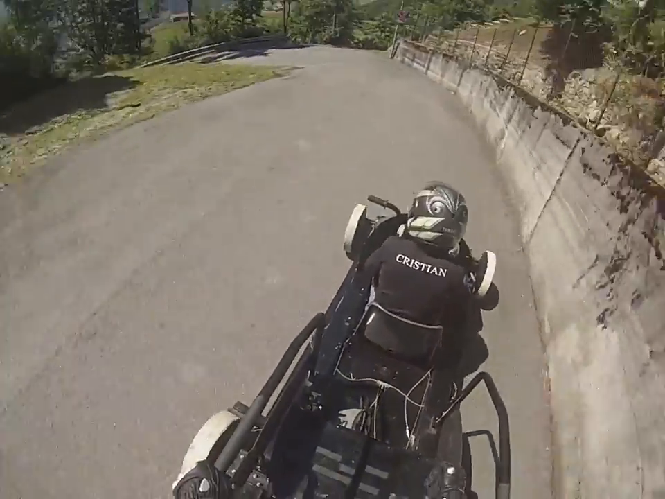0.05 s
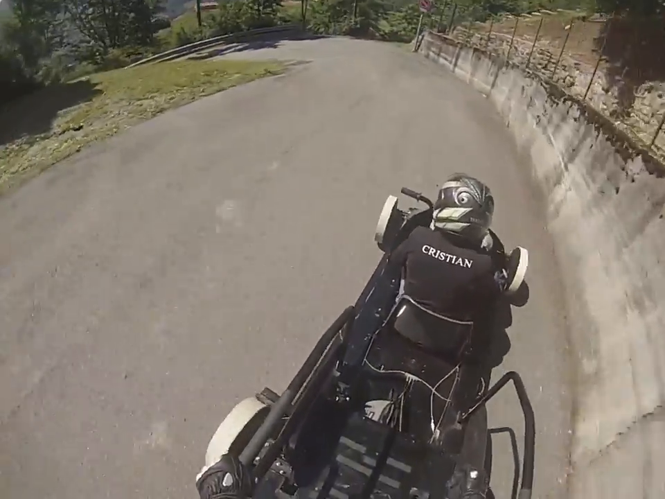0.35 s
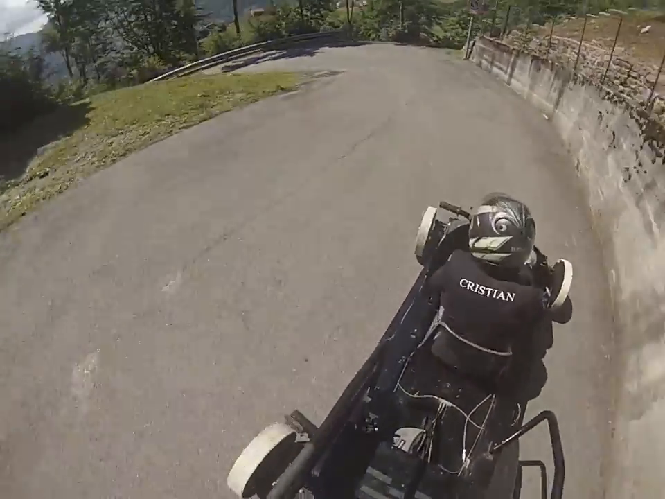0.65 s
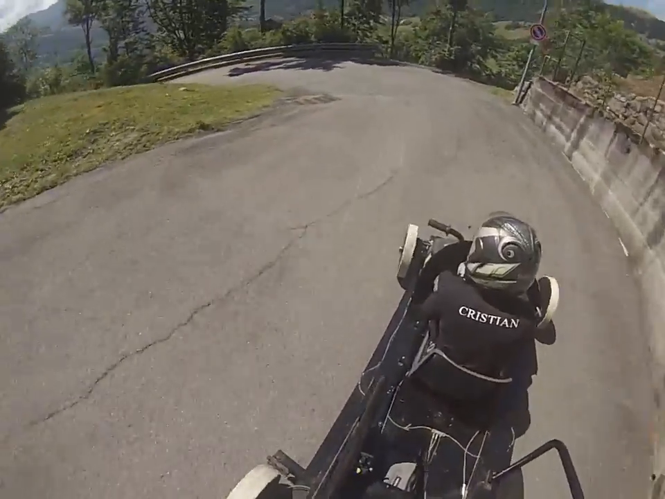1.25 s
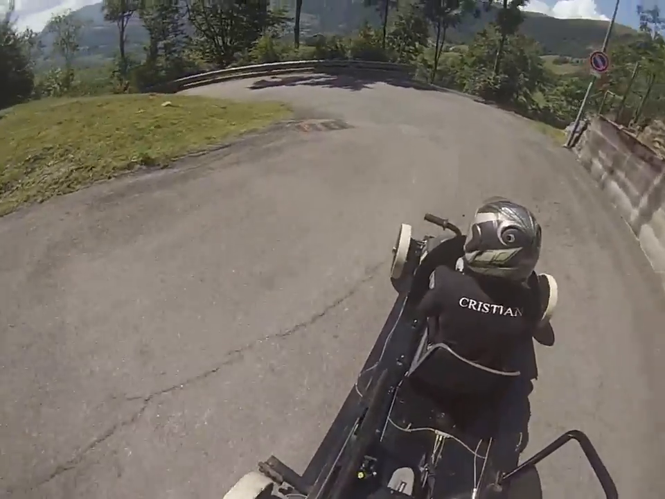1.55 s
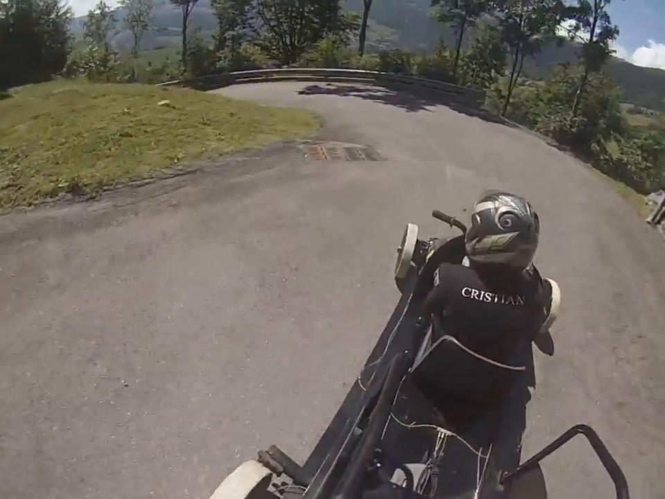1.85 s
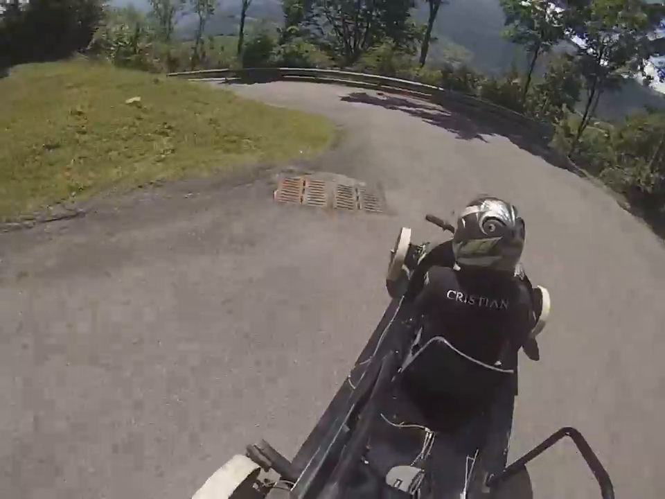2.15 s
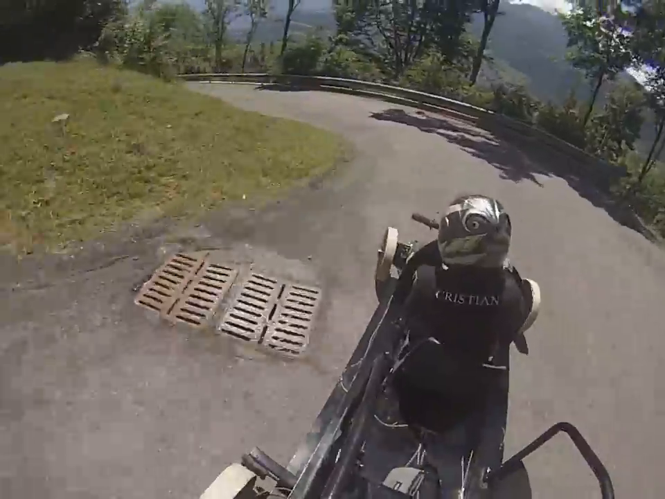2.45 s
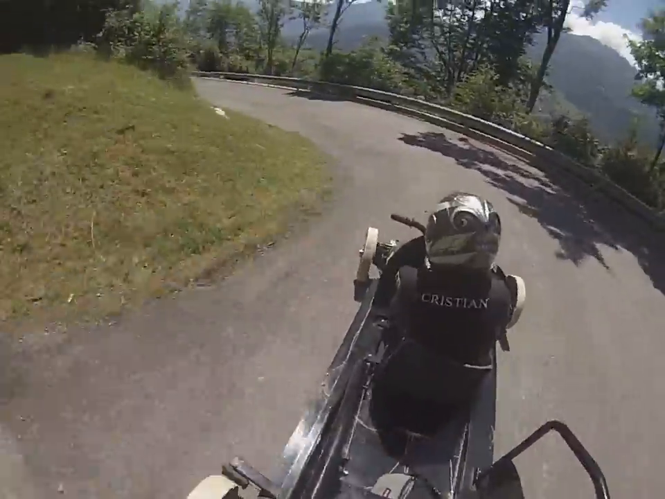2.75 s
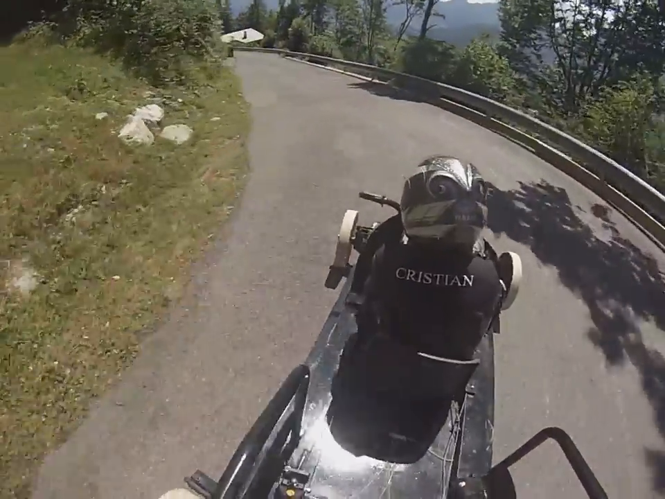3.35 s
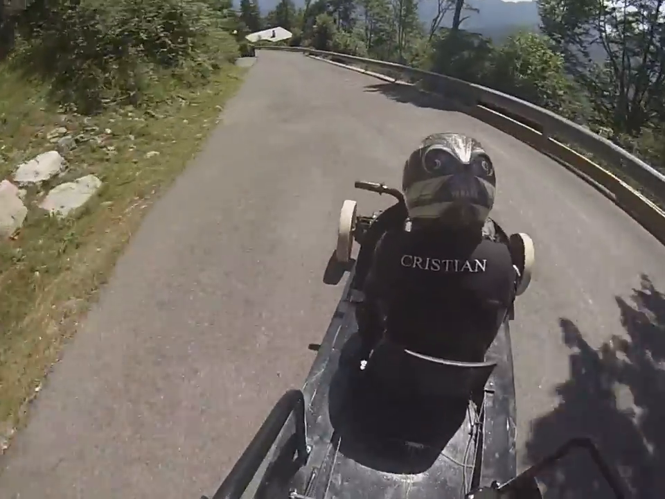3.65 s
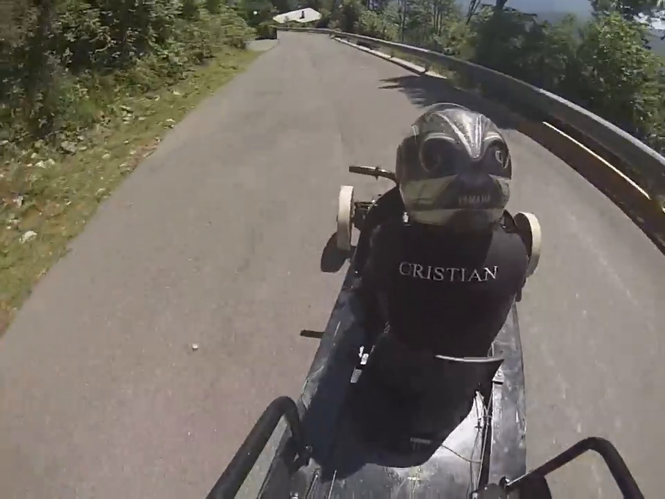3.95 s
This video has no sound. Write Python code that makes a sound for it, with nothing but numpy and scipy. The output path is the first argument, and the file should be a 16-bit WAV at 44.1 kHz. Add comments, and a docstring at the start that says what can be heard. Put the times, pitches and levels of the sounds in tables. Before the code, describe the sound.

A soap box cart rolls on asphalt, heard from on board as a low shuddering rumble with chattering rattles, scattered knocks and light wind. Two thumps come near 1.7 seconds and the rolling grows louder. From 2 seconds grit crackles and stones tick against the cart. Heavier bumps land around 2.7 and 3.1 seconds, the first ringing briefly. A loose bracket rattles, with small clinks near 2.4 and 3.5 seconds.

```python
"""On an asphalt road, a soap box cart coasts downhill, heard from a camera fixed to its frame.
Air rushes past, grit crackles under the wheels and flicked stones tick against the cart.
Bumps boom in the frame and make loose parts knock; a bracket rattles and a metal fitting clinks.
The cart shudders on its tyres, while the grain of the road drums the frame and makes the
camera mount chatter, louder as the road gets rougher."""
import sys
import numpy as np
from scipy import signal
from scipy.fft import rfft, irfft
from scipy.io import wavfile

SR = 44100
rng = np.random.default_rng(int(sys.argv[2]) if len(sys.argv) > 2 else 0)


def store_wav(level_fs):
    """Save 16-bit WAV to argv[1]."""
    pcm = np.round(np.clip(np.atleast_2d(level_fs), -1, 1) * 32767)
    wavfile.write(sys.argv[1], SR, pcm.T.astype(np.int16))


N = 176400

# pitches at which the cart's frame rings: f/Hz, width/Hz, level/dB
FRAME_RESONANCES = [(101, 17, -11.5), (126.6, 22, 0.5), (206.6, 74.5, 1), (258, 33, -2.5), (319.5, 59, -1),
                    (363.6, 40, 1), (392.9, 41.4, 0.5), (515.4, 92, -11.5), (640, 434, -21.5)]
# pitches at which the camera's mount and housing ring: f/Hz, width/Hz, level/dB
MOUNT_RESONANCES = [(756, 760, -12.5), (963, 180, -10), (1198, 132, -3), (1328, 71, -0.5), (1414, 82, 0.5),
                    (1502, 120, -7), (1634, 144, -10.5), (2048, 350, -9), (2357, 148, -14.5),
                    (2744, 220, -21.5), (3120, 190, -25), (3740, 1470, -35.5), (5240, 210, -33.5)]


def undb(db):
    """Turn decibels into a gain to multiply by."""
    return 10 ** (np.asarray(db) / 20)


def unit(x):
    """Scale a signal to an average power of 1."""
    return x / np.sqrt(np.mean(x ** 2))


def curve(table, column=1):
    """A gain for every sample, gliding between rows of time and dB."""
    rows = np.array(table)
    return undb(np.interp(np.arange(N) / SR, rows[:, 0], rows[:, column]))


def wander(rate_hz):
    """A smooth random wobble of typical size 1, mostly slower than rate_hz."""
    f = np.arange(N // 2 + 1) * SR / N
    return unit(irfft(rfft(rng.standard_normal(N)) / (1 + (f / rate_hz) ** 2), N))


def ring(x, resonances):
    """Let x ring an object at its own pitches; white noise would keep its power."""
    size = 2 * N
    f = np.arange(N + 1) * SR / size
    power = sum(undb(db) ** 2 / (1 + ((f - hz) / (width / 2)) ** 2) ** 2 for hz, width, db in resonances)
    # keeping half the cepstrum makes the ringing follow each hit, never come before it
    cepstrum = irfft(np.log(power / power.mean() + 1e-12))[:N]
    cepstrum[0] /= 2
    response = np.exp(rfft(cepstrum, size))
    return irfft(rfft(x, size) * response)[:N]


def grains(per_second, spread_db):
    """Tiny impacts of uneven size at random moments."""
    lands = rng.random(N) < per_second / SR
    size = undb(spread_db * np.clip(rng.standard_normal(N), -2, 2))
    sign = rng.choice([-1, 1], N)
    return unit(lands * sign * size)


def burst(start, rise_s, decay_s):
    """The loudness of one hit: a quick rise, then a fade."""
    age = np.maximum(np.arange(N) / SR - start, 0)
    return np.minimum(age / rise_s, 1) * np.exp(-np.maximum(age - rise_s, 0) / decay_s)


def strike(hits, tones, decay_s, scatter_db, detune, rise_s=.0003):
    """Each hit lands on a different spot, so it rings the same tones a little differently."""
    out = np.zeros(N)
    age = np.arange(N // 40) / SR
    fade = np.exp(-age / decay_s) * np.minimum(age / rise_s, 1)
    hz, tone_db = np.array(tones).T
    for start, db in hits:
        colour, shift = rng.standard_normal((2, len(hz)))
        gains = undb(db + tone_db + scatter_db * colour)
        waves = np.sin(2 * np.pi * np.outer(hz * (1 + detune * shift), age))
        first = int(start * SR)
        out[first:first + len(age)] += (gains @ waves * fade)[:N - first]
    return out


def air(gust_db=2, rush_db=-41.5, hiss_db=-70):
    """Gusty wind pushes on the camera housing, drones inside it and hisses thinly past it."""
    # the low rush of air: f/Hz, width/Hz, level/dB
    rush_bands = [(24.6, 83, -8), (90.5, 890, -16), (500, 1200, -26)]
    # strength of the drone, greatest as the cart leaves a bend: t/s, level/dB
    drone_levels = [(0, -54), (1.0, -47.5), (2.4, -48), (3.0, -36), (3.7, -34), (4, -45)]
    # the pitch at which the housing drones: f/Hz, width/Hz, level/dB
    drone_resonance = [(109.5, 33, 0)]
    # the steady hiss: f/Hz, width/Hz, level/dB
    hiss_bands = [(5450, 330, 14), (6500, 5600, 6), (10700, 3500, -3.5)]
    gusts = undb(gust_db * wander(3.8))
    rush = undb(rush_db) * ring(rng.standard_normal(N), rush_bands)
    drone = curve(drone_levels) * ring(rng.standard_normal(N), drone_resonance)
    hiss = undb(hiss_db) * ring(rng.standard_normal(N), hiss_bands)
    return gusts * (rush + drone) + hiss


def grit(jolts, patchy_db=2.5, sand_db=-1, crack_db=-16.5):
    """Sand crunches under the wheels in patches, lone grains crack brightly, small stones scuff."""
    # strength of the crunching: t/s, level/dB
    grit_levels = [(0, -45.5), (.2, -59.5), (.42, -55), (.7, -61), (1.45, -58), (1.75, -53.5),
                   (1.86, -45.5), (2.0, -52), (2.28, -49.5), (2.37, -40.5), (2.52, -51), (2.63, -42),
                   (2.75, -48.5), (2.88, -45), (2.95, -44.5), (3.1, -46), (3.45, -47.5), (3.74, -45),
                   (3.83, -45.5), (4, -46)]
    # stones scuffed by a wheel: t/s, level/dB, decay/s
    scuff_times = [(.086, -57, 0.0091), (.398, -46, 0.02), (.558, -48, 0.022), (.722, -47, .01),
                   (.868, -50.5, .012), (1.15, -51, .008), (1.233, -45.5, .01), (1.258, -50, .008),
                   (1.497, -46.5, 0.011), (1.545, -49, .012), (1.852, -54, 0.018), (2.146, -40, 0.0071),
                   (2.186, -42.5, .008), (2.236, -43, .01), (2.333, -49, 0.011), (2.369, -51, .01),
                   (2.53, -42, 0.0091), (2.618, -43, 0.017), (2.775, -40.5, 0.019), (2.866, -43, 0.016),
                   (3.001, -43, .008), (3.561, -36.5, 0.006), (3.622, -42, 0.013), (3.707, -38.5, 0.014),
                   (3.792, -38, 0.0065)]
    # pitches rung by sand and scuffs: f/Hz, width/Hz, level/dB
    grit_resonances = [(3070, 2550, 4.5), (3890, 78, 7), (4216, 290, 3.5), (4840, 480, 2.5),
                       (5450, 380, 7.5), (6250, 760, 2), (6940, 1020, -1), (8200, 460, -16),
                       (9660, 3600, -14), (11800, 1400, -23)]
    # pitches rung by cracking grains: f/Hz, width/Hz, level/dB
    crack_resonances = [(7040, 860, 5.5), (8330, 560, 1.5), (9740, 1000, -6.5), (11030, 1400, -9.5),
                        (12200, 700, -14)]
    patches = undb(jolts + patchy_db * wander(34))
    sand = unit(grains(per_second=3900, spread_db=3.5) * patches) * curve(grit_levels)
    cracks = unit(grains(per_second=220, spread_db=2) * patches) * curve(grit_levels)
    scuff_gain = sum(undb(db) * burst(start, rise_s=.0013, decay_s=decay)
                     for start, db, decay in scuff_times)
    scuffs = scuff_gain * grains(per_second=2700, spread_db=.5)
    crunch = ring(undb(sand_db) * sand + scuffs, grit_resonances)
    return crunch + undb(crack_db) * ring(cracks, crack_resonances)


def stone_ticks():
    """Single stones are flicked against the cart and tick sharply."""
    # stone hits: t/s, level/dB
    hits = [(1.852, -41), (2.147, -37), (2.187, -40), (2.235, -39), (2.336, -38), (2.535, -40),
            (2.726, -36), (2.773, -36), (2.878, -33), (2.894, -35), (3.002, -34), (3.094, -37),
            (3.368, -37), (3.595, -37), (3.705, -37), (3.718, -34), (3.757, -36), (3.904, -36),
            (3.927, -37)]
    # tones they ring: f/Hz, level/dB
    tones = [(4100, -5), (5400, -6), (6400, -2), (7100, -3), (8400, -8), (9700, -12), (10700, -11),
             (11900, -14)]
    return strike(hits, tones, decay_s=.002, scatter_db=1, detune=.025)


def metal_clinks():
    """A small metal fitting is knocked twice and rings briefly."""
    # knocks on the metal: t/s, level/dB
    hits = [(2.42, -34), (3.488, -31)]
    # its tones: f/Hz, level/dB
    tones = [(3178, 0), (3757, -9), (4250, -12), (4800, -8), (5520, -12), (6280, -10), (8360, -14),
             (9080, -22)]
    return strike(hits, tones, decay_s=.0042, scatter_db=2, detune=.003)


def bracket_rattle(jolts):
    """A loose bracket taps and rings, loudest on the rough stretch."""
    # strength of the tapping: t/s, level/dB
    tap_levels = [(0, -46), (1.7, -50), (2.2, -39), (2.5, -42), (2.65, -32), (3.4, -35.5), (3.5, -43),
                  (3.7, -29.5), (4, -29)]
    # pitches at which the bracket rings: f/Hz, width/Hz, level/dB
    bracket_resonances = [(1200, 38, -8.5), (1357, 40, 0), (1426, 56, -4)]
    taps = unit(grains(per_second=170, spread_db=2.5) * undb(jolts))
    return ring(taps * curve(tap_levels), bracket_resonances)


def knocks(rise_s=.002):
    """Each bump sets off a short rattle of the mount and of loose parts."""
    # bumps: t/s, mount level/dB, loose parts level/dB, decay/s
    bumps = [(0.036, -31, -42, 0.026), (0.088, -24, -46, 0.015), (0.411, -35, -47, 0.023),
             (0.563, -23, -34, 0.011), (0.579, -28.5, -42, 0.03), (0.722, -26.5, -29, .015),
             (.965, -29, -35, 0.0086), (1.061, -28.5, -37, 0.018), (1.187, -28.5, -42, 0.0095),
             (1.243, -29.5, -56, 0.036), (1.501, -32, -59, 0.047), (1.58, -29, -55, 0.015),
             (1.639, -20.5, -32, 0.0075), (1.656, -20, -49, 0.0044), (1.784, -20.5, -30, 0.018),
             (2.214, -26.5, -50, 0.008), (2.618, -15, -36, 0.013), (2.725, -20, -43, 0.0073),
             (2.782, -20, -41, 0.014), (2.818, -23, -31, 0.0072), (2.877, -18, -51, 0.012),
             (2.979, -17.5, -45, 0.01), (3.001, -22, -44, 0.009), (3.09, -20.5, -34, 0.022),
             (3.226, -23.5, -48, 0.032), (3.292, -20, -31, 0.014), (3.678, -25.5, -36, 0.019),
             (3.717, -19, -26, 0.016), (3.843, -17, -26, 0.0063), (3.885, -17, -48, 0.013)]
    # pitches at which the loose parts ring: f/Hz, width/Hz, level/dB
    loose_resonances = [(2060, 340, 0), (2370, 280, -1.5), (2750, 180, -12), (3150, 200, -20),
                        (4000, 400, -23), (6000, 2000, -32)]
    mount_gain = loose_gain = 0
    for start, mount_db, loose_db, decay_s in bumps:
        shape = burst(start, rise_s, decay_s)
        mount_gain += undb(mount_db) * shape
        loose_gain += undb(loose_db) * shape
    mount = ring(mount_gain * grains(per_second=6000, spread_db=2), MOUNT_RESONANCES)
    loose = ring(loose_gain * grains(per_second=6000, spread_db=2), loose_resonances)
    return mount + loose


def thumps(rise_s=.011, decay_s=.011):
    """Heavy bumps boom in the frame; one hard bump leaves a frame tube ringing."""
    # heavy bumps: t/s, level/dB
    bumps = [(.08, -36), (1.653, -22), (1.779, -20), (2.765, -19.5), (3.08, -19.5), (3.619, -27)]
    # the ringing tube: t/s, f/Hz, level/dB, decay/s
    tube_note = (2.718, 334, -15, .038)
    blows = sum(undb(db) * burst(start, rise_s, decay_s) for start, db in bumps)
    boom = ring(blows * rng.standard_normal(N), FRAME_RESONANCES)
    start, hz, db, tube_decay_s = tube_note
    tube = np.sin(2 * np.pi * hz * np.arange(N) / SR)
    return boom + undb(db) * burst(start, rise_s, tube_decay_s) * tube


def shudder(bounce_hz=38.5, drift=.06, sway_db=1.2, shake_db=-8):
    """The cart bounces on its tyres at a low, wandering pitch and shakes unevenly around it."""
    # strength of the shudder: t/s, level/dB
    shudder_levels = [(0, -16), (.06, -14.5), (.095, -24), (.135, -14), (.22, -17), (.3, -19), (.4, -17),
                      (.55, -25), (.62, -20), (.75, -18), (1.05, -21), (1.13, -26), (1.42, -22.5),
                      (1.6, -34), (1.68, -19), (2.05, -22), (2.24, -21), (2.31, -29), (2.37, -21),
                      (2.49, -23), (2.57, -14.5), (2.68, -13), (2.75, -19), (2.9, -14.5), (2.97, -19.5),
                      (3.08, -17), (3.23, -26), (3.45, -24), (3.76, -20), (3.87, -30), (4, -36)]
    # the uneven shaking: f/Hz, width/Hz, level/dB
    shake_bands = [(25, 9.6, -3), (46.4, 17.4, -7)]
    pitch_hz = bounce_hz * (1 + drift * wander(12))
    phase = 2 * np.pi * np.cumsum(pitch_hz) / SR
    bounce = np.sin(phase) * undb(sway_db * wander(11))
    shake = unit(ring(rng.standard_normal(N), shake_bands))
    return (bounce + undb(shake_db) * shake) * curve(shudder_levels)


def rolling(jolts, frame_db=-.5, mount_db=-1):
    """The grain of the asphalt drums the frame and makes the camera mount chatter."""
    # strength of the rolling: t/s, drumming level/dB, chatter level/dB
    road_levels = [(0, -30, -28), (.2, -37.5, -36), (.43, -31, -30.5), (.53, -36, -36.5), (.64, -31, -31.5),
                   (.85, -32, -36.5), (1.4, -31, -36.5), (1.65, -26.5, -32.5), (1.9, -24.5, -27.5),
                   (2.1, -25.5, -30), (2.33, -22, -25), (2.52, -23.5, -27.5), (2.64, -22, -24),
                   (3.0, -22, -25), (3.2, -22, -24.5), (3.42, -23.5, -25), (3.5, -21, -25.5),
                   (3.58, -20, -24.5), (3.73, -19, -22.5), (3.82, -22, -25), (4, -20.5, -22)]
    drumming = unit(grains(per_second=5000, spread_db=3) * undb(jolts / 2))
    chatter = unit(grains(per_second=4500, spread_db=1) * undb(jolts + wander(70)))
    frame = ring(drumming * curve(road_levels, column=1), FRAME_RESONANCES)
    mount = ring(chatter * curve(road_levels, column=2), MOUNT_RESONANCES)
    return undb(frame_db) * frame + undb(mount_db) * mount


def scene():
    """Add it all into one channel; the same uneven road jolts frame, mount, wheels and bracket."""
    jolts = wander(49)  # quick ups and downs in level, in dB
    mix = (shudder() + rolling(jolts) + knocks() + thumps() + grit(jolts)
           + stone_ticks() + metal_clinks() + air() + bracket_rattle(jolts))
    return mix[None]


def record(dry):
    """The camera cuts off the highest treble."""
    top_hz = 14300
    return signal.sosfilt(signal.ellip(8, .2, 70, top_hz, fs=SR, output="sos"), dry)


dry = scene()
out = record(dry)
store_wav(out)
```